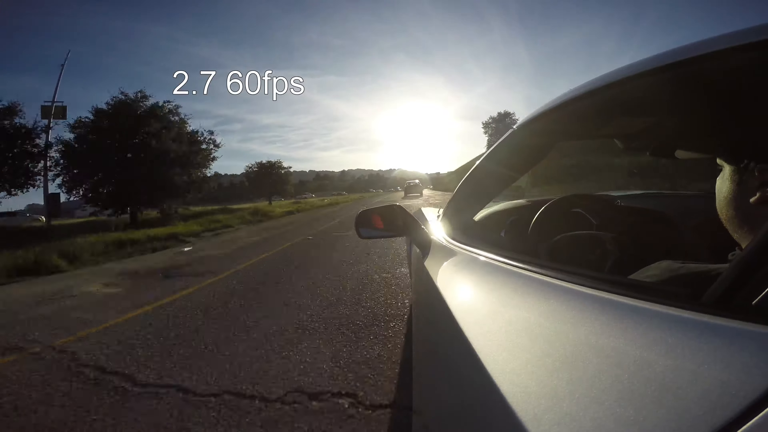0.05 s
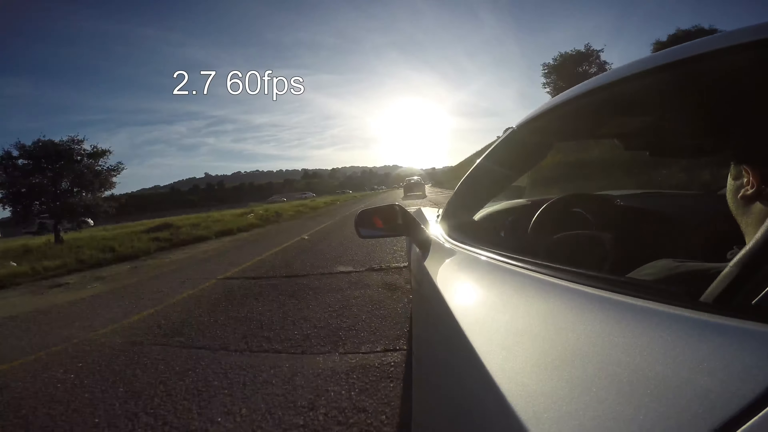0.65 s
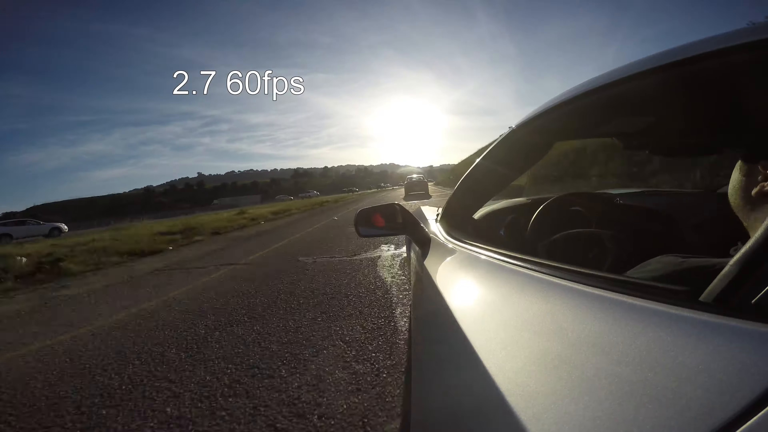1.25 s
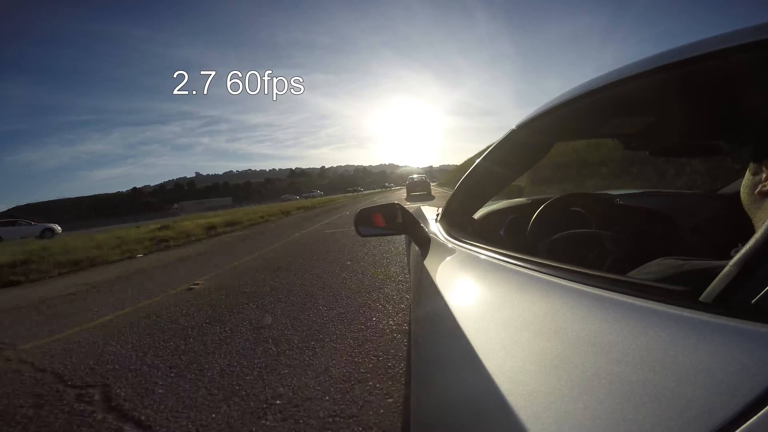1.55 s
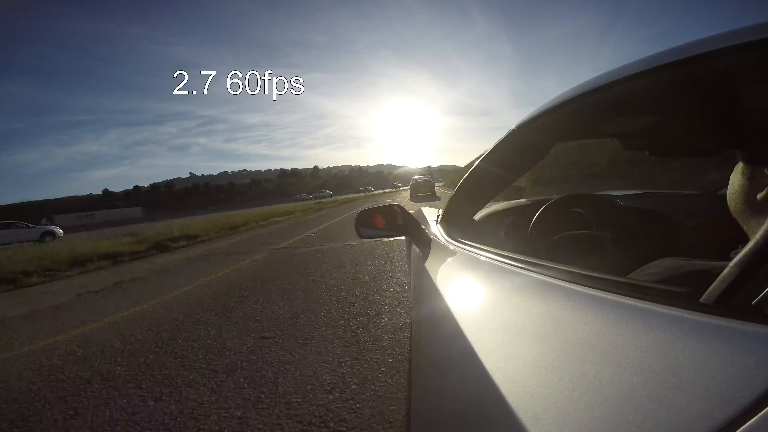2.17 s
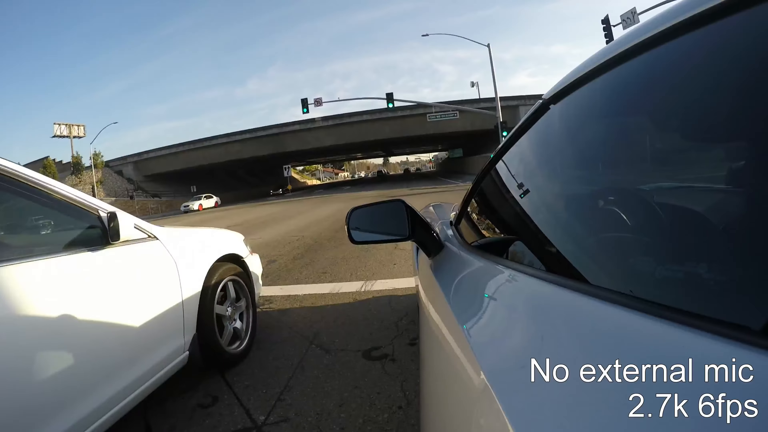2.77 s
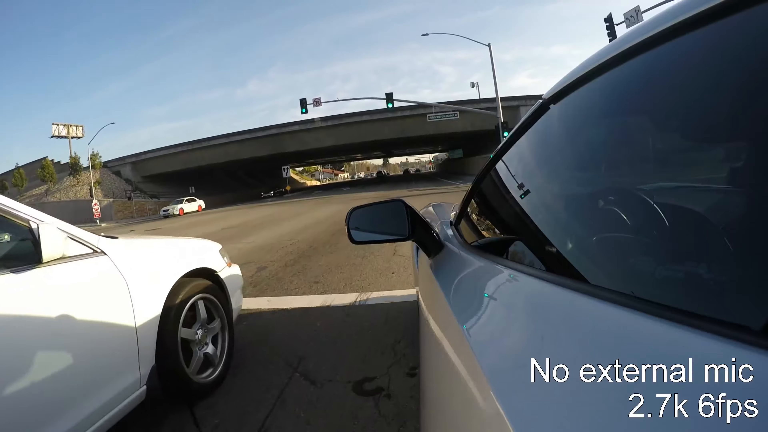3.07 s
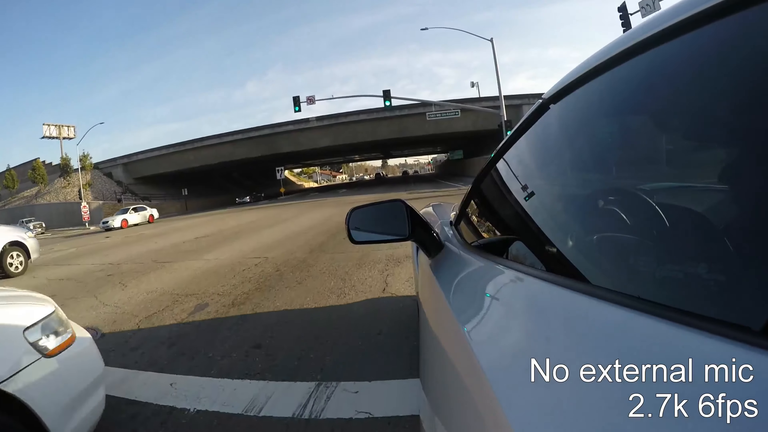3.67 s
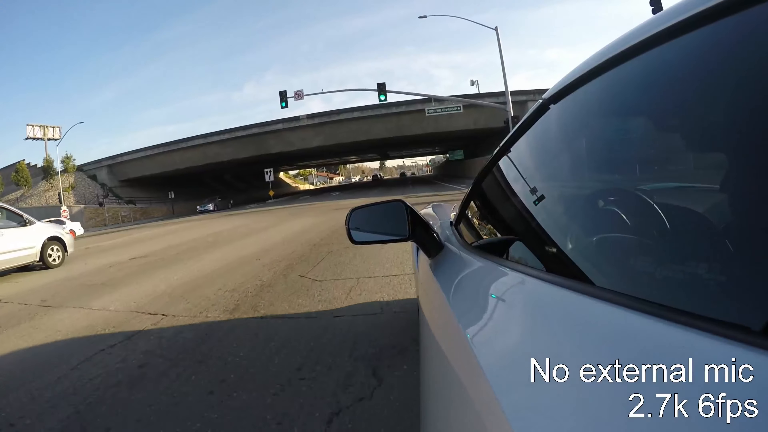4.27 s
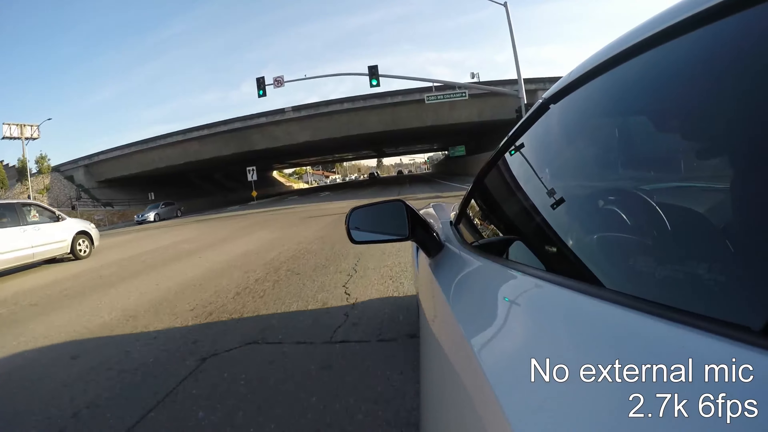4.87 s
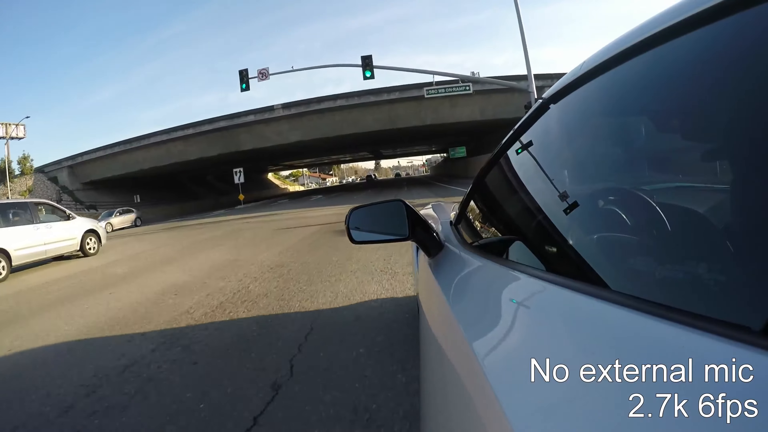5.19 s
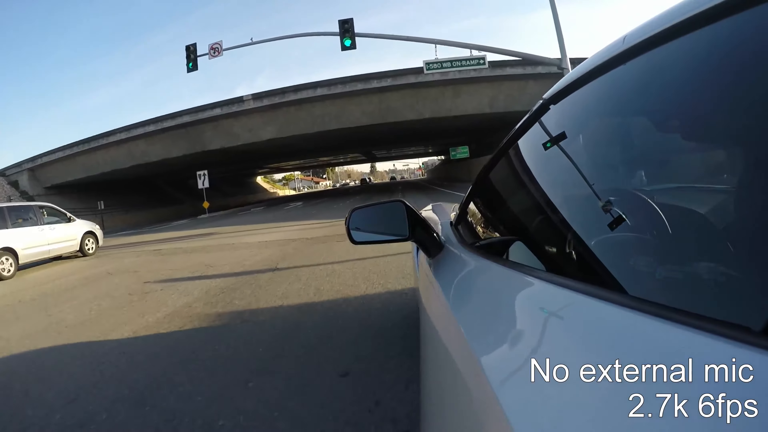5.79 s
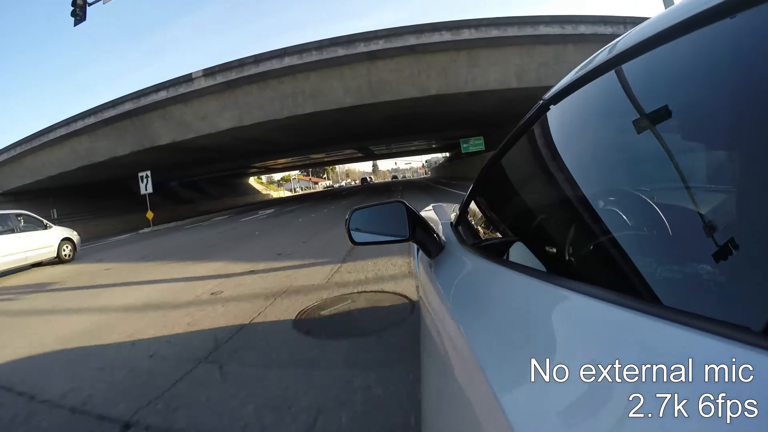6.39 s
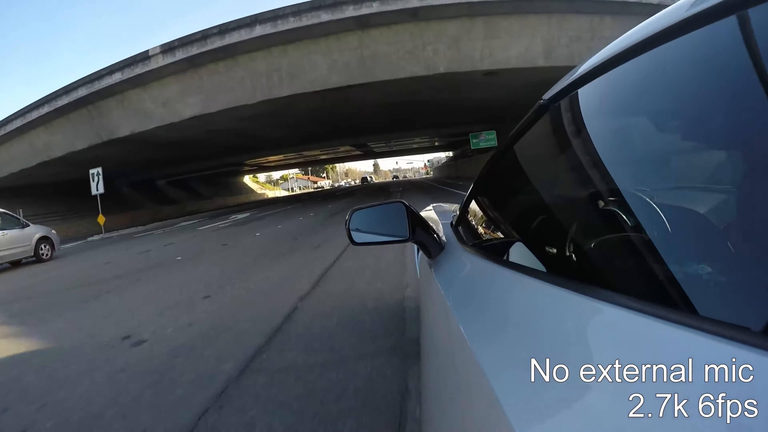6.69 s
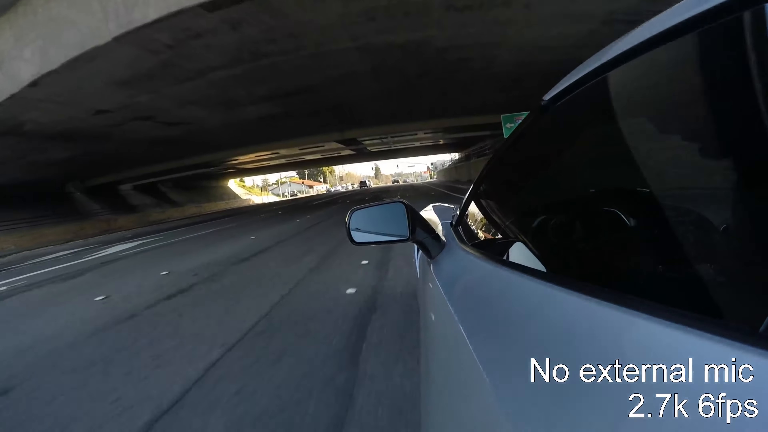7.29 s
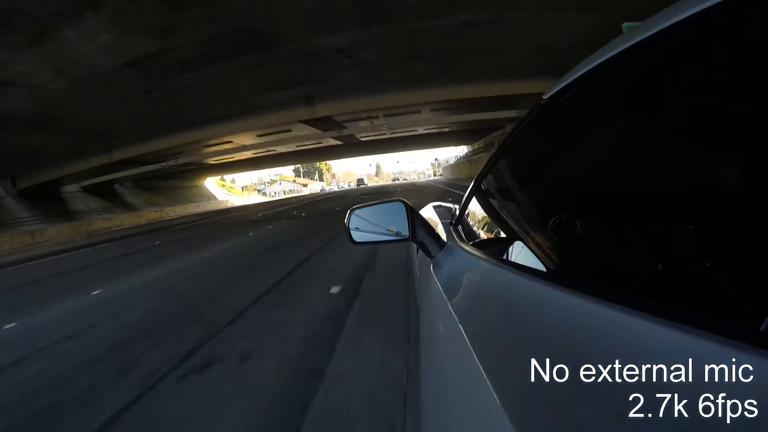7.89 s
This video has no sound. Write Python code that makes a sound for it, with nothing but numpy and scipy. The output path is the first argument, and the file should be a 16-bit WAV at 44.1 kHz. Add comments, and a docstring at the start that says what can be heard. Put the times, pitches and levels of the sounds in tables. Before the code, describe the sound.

A sports car coasts with a burbling, popping exhaust, then pulls away with a short tyre scrub and revs up through rising wind.

```python
"""A V8 sports car, heard from its side, in two scenes. First it coasts down a rough road in wide
stereo: the exhaust hums, the tyres roar and wind gusts. Grit ticks, a tyre thumps over a joint,
and the engine misfires, burbling and popping. After an instant of silence, in near mono, the car
pulls away from a junction with a short tyre scrub. It revs up towards an underpass while road
roar and wind grow, and hits a few more joints at the end."""
import sys
import numpy as np
from scipy import signal
from scipy.fft import rfft, irfft, next_fast_len
from scipy.io import wavfile

SR = 44100
rng = np.random.default_rng(int(sys.argv[2]) if len(sys.argv) > 2 else 0)


def store_pcm(level_fs):
    """Save levels as 16-bit WAV."""
    pcm = np.round(np.clip(level_fs, -1, 1) * 32767).astype(np.int16)
    wavfile.write(sys.argv[1], SR, np.atleast_2d(pcm).T)


N = 355005
CUT_S, RESUME_S = 2.755, 2.763   # the first scene ends, the second begins


def from_db(db):
    """Turn decibels into a gain."""
    return 10 ** (np.asarray(db) / 20)


def rms_one(x):
    """Scale to a power of 1."""
    return x / np.sqrt(np.mean(x ** 2) + 1e-20)


def in_time(rows, t):
    """Read a curve at times t."""
    return np.interp(t, *np.transpose(rows))


def at_hz(rows, hz):
    """Read a curve at a frequency, spacing the octaves evenly."""
    row_hz, value = np.transpose(rows)
    return np.interp(np.log(hz + 1e-3), np.log(row_hz), value)


def drift(t, rate):
    """A random wander of about 1, with a new value rate times a second."""
    knots = rng.standard_normal(4096)
    return rms_one(np.interp(t * rate, np.arange(len(knots)), knots))


def swell(t, s, half_s):
    """A smooth hump of height 1 around time s."""
    return np.exp(-.5 * ((t - s) / half_s) ** 2)


def between(t, start_s, end_s, ramp_s=0.065):
    """1 from start to end, 0 outside, with short ramps."""
    return np.clip(np.minimum(t - start_s, end_s - t) / ramp_s + .5, 0, 1)


def burst(t, s, db, decay_s):
    """The loudness of a hit that rises within 3 ms and dies away."""
    rise = np.sin(np.pi / 2 * np.clip((t - s) / .003 + .5, 0, 1)) ** 2
    return from_db(db) * rise * np.exp(-np.abs(t - s) / decay_s)


def coloured(t, colour, count):
    """Frequencies and spectra of unrelated noises of one colour, fading past the table's ends."""
    size = 2 * next_fast_len(len(t) // 2 + 1)
    hz = np.arange(size // 2 + 1) * SR / size + 1e-3
    edges = 1 / np.sqrt((1 + (.8 * colour[0][0] / hz) ** 8) * (1 + (.8 * hz / colour[-1][0]) ** 8))
    return hz, rfft(rng.standard_normal((count, size))) * from_db(at_hz(colour, hz)) * edges


# Which side is louder. Each row: frequency in Hz, left minus right in dB.
BALANCE = [(20, 2.9), (60, 0.5), (110, -2), (200, -5), (380, -9), (700, -2.5), (1100, -0.5), (2000, -2),
           (4400, -1.5)]
# How far the left wave runs ahead. Each row: frequency in Hz, lead in radians.
LEFT_LEAD = [(90, 2), (290, 2.5), (420, 2.5), (600, 3), (750, 3), (900, 2), (1100, 1.73), (1400, 1),
             (1800, 0.8), (3200, 0)]
# How alike the two sides are. Each row: frequency in Hz, likeness from 0 to 1.
LIKENESS = [(60, 0.78), (200, .88), (380, 0.73), (750, 0.85), (1400, 1), (2000, .52), (4000, .6),
            (7000, .08)]

def wide_noise(t, colour):
    """Noise that reaches the two sides out of step, plus a part of their own."""
    hz, (shared, own_left, own_right) = coloured(t, colour, count=3)
    alike = np.clip(at_hz(LIKENESS, hz), 0, .97)
    lead, lean = at_hz(LEFT_LEAD, hz), from_db(at_hz(BALANCE, hz) / 2)
    left = (np.sqrt(alike) * shared * np.exp(1j * lead) + np.sqrt(1 - alike) * own_left) * lean
    right = (np.sqrt(alike) * shared + np.sqrt(1 - alike) * own_right) / lean
    sum_gain = np.sqrt(lean ** 2 + lean ** -2 + 2 * alike * np.cos(lead))
    x = irfft(np.array([left, right]) / sum_gain)[:, :len(t)]
    return x / np.std(x.mean(axis=0))


# Stereo width. Each row: frequency in Hz, the sides' difference against their shared part in dB.
WIDTH = [(400, -71), (2400, -49), (4400, -34.5), (8000, -21.5), (15000, -13)]

def narrow_noise(t, colour):
    """Noise that is nearly the same on both sides."""
    hz, (mid, side) = coloured(t, colour, count=2)
    side = side * from_db(at_hz(WIDTH, hz))
    x = irfft([mid + side, mid - side])[:, :len(t)]
    return x / np.std(x.mean(axis=0))


def crank(t, firing, jitter):
    """Turns per second and angle of the crankshaft: a V8 fires four times a turn, never quite evenly."""
    speed = in_time(firing, t) / 4 * (1 + jitter * drift(t, 60))
    return speed, 2 * np.pi * np.cumsum(speed) / SR


def exhaust_tones(t, speed, strong_db, weak_db, strong_shake, pipe, spread_db, waver_hz, weak_shake=.8):
    """Unequal cylinders make a tone at every half step of 'order', the multiple of crank speed."""
    for order in np.arange(1, 65) / 2:
        hz = speed * order
        level_db, shake = weak_db + spread_db * drift(t, 2.384), weak_shake
        if order in strong_db:
            level_db, shake = strong_db[order], strong_shake
        # uneven burning shakes each tone in strength and timing
        along, across = 1 + shake * drift(t, waver_hz), shake * drift(t, waver_hz)
        waver = np.hypot(along, across) / np.sqrt(1 + 2 * shake ** 2)
        phase = np.arctan2(across, along) + rng.uniform(0, 2 * np.pi)
        yield order, hz, from_db(level_db + at_hz(pipe, hz)) * waver, phase


def firing_puffs(angle, depth):
    """Noise swells each time a cylinder fires."""
    return 1 + depth * np.cos(4 * angle)


# Tones that stand out while coasting. Each row: order, boost in dB before the burble,
# boost in dB after it, extra dB during the lope.
COAST_TONES = [(1, -4, 9, -2), (1.5, -11, -11, 11), (2, -3, -1, 4), (2.5, -11, -6, 6), (3, 6, 7.5, 1),
               (4, 11.5, 12, -4), (5, -11, -6, 0), (6, -4, -8, 21), (7.5, -3, -5, -3), (8, 4.5, 0, -4),
               (8.5, 3.5, 0, -2), (9, -3, -3, -3), (10, -10, -3, 0), (10.5, -12, -12, 10), (11, 2, 1.5, -2),
               (11.5, -4, -8, 7), (12, -3, 3.5, -2), (12.5, -10, -3.5, -3), (14, 3, 3, -6), (16, 0, -1, 0),
               (20, 0, 0, 0)]
# How the pipe colours the tones with the throttle shut. Each row: frequency in Hz, gain in dB.
SHUT_PIPE = [(40, -40), (85, -32), (100, -26.5), (140, -35), (170, -32.5), (240, -33.5), (280, -45),
             (340, -37), (400, -39), (440, -35), (465, -31.5), (495, -34), (530, -24.5), (560, -28),
             (595, -39), (650, -28.5), (760, -45), (880, -37), (950, -44), (1500, -51), (2200, -58)]

def coasting_exhaust(t, speed, angle):
    """The exhaust hums, burbles as it misfires, then lopes as every other cylinder fires weakly."""
    start_s, end_s = 1.04, 1.39   # the burble
    burble, lope = between(t, start_s, end_s), between(t, end_s, 1.8)
    progress = np.clip((t - start_s) / (end_s - start_s), 0, 1)
    # misfiring lifts the weak tones, and lowers and shakes the strong ones
    weak_db = -12.5 + 3 * burble + 2.5 * lope
    strong_db = {order: 0.5 - 6 * burble + before_db + (after_db - before_db) * progress + lope_db * lope
                 for order, before_db, after_db, lope_db in COAST_TONES}
    shake = np.maximum(.1, .9 * burble)
    tones = exhaust_tones(t, speed, strong_db, weak_db, shake, SHUT_PIPE, spread_db=5, waver_hz=27.58)
    out = np.zeros((2, len(t)))
    for order, hz, gain, phase in tones:
        lean = from_db(at_hz(BALANCE, hz) / 2)
        out[0] += gain * lean * np.sin(order * angle + phase + at_hz(LEFT_LEAD, hz))
        out[1] += gain / lean * np.sin(order * angle + phase)
    return 2 * out   # the sides nearly cancel, so each is louder than their average


# The colour of light wind. Each row: frequency in Hz, level in dB.
BREEZE = [(8, 1), (20, 3.5), (38, -4.5), (55, -5), (80, -8), (140, -17.5), (300, -34.5)]
# Puffs of wind. Each row: time in seconds, level in dB.
BREEZE_GUSTS = [(.135, -25), (.28, -36), (.48, -17), (.6, -36), (.87, -21), (1.22, -21), (1.52, -20),
                (2.26, -22)]

def coasting_wind(t):
    """Air buffets the microphone: a low flutter with short gusts."""
    strength = from_db(-25.5) + sum(from_db(db) * swell(t, s, half_s=0.015) for s, db in BREEZE_GUSTS)
    return strength * from_db(3.2 * drift(t, 8.66)) * wide_noise(t, BREEZE)


# The colours of tyre roar and rumble. Each row: frequency in Hz, level in dB.
ASPHALT_ROAR = [(410, -39.5), (700, -5.5), (746, -7.5), (1060, -2.5), (1150, -5.5), (1420, -7),
                (1760, -13.5), (2370, -21), (2760, -20), (3140, -27.5), (3660, -25), (5110, -42.5),
                (10900, -49.5), (15000, -71)]
ASPHALT_RUMBLE = [(40, -3.5), (80, -10), (200, -4.5), (275, 1), (350, -2), (550, -0.5), (700, -2),
                  (1000, -24.5)]
# The rumble follows the state of the asphalt. Each row: time in seconds, level in dB.
ROUGHNESS = [(0, -27.5), (1.35, -27.5), (1.6, -31.5), (2.02, -31.5), (2.2, -25), (2.32, -33), (2.75, -33.5)]

def coasting_tyres(t):
    """Tyres roar and rumble on coarse asphalt, sinking a little as the car slows."""
    roar = from_db(-32 + 0.7 * drift(t, 40.13)) * wide_noise(t, ASPHALT_ROAR)
    rumble = from_db(in_time(ROUGHNESS, t) + 0.34 * drift(t, 35.12)) * wide_noise(t, ASPHALT_RUMBLE)
    return from_db(-0.3 * (t - t.mean())) * (roar + rumble)


# The engine slowing down. Each row: time in seconds, firings per second.
COAST_FIRING = [(0, 245.3), (0.3, 235.6), (1.05, 208.4), (1.7, 191.1), (2.3, 175.7), (2.75, 170.6)]

def coasting(t):
    """The first scene: the car rolls with the throttle shut."""
    speed, angle = crank(t, COAST_FIRING, jitter=0.0023)
    exhaust = coasting_exhaust(t, speed, angle)
    return exhaust + coasting_wind(t) + coasting_tyres(t) * firing_puffs(angle, depth=0.16)


# Tiny stones. Each row: time in seconds, level in dB, middle frequency in Hz.
STONES = [(.793, -54, 7000), (.898, -54, 7000), (.958, -58, 7000), (1.249, -55, 6000), (2.51, -56, 7000),
          (5.72, -45, 7500), (6.487, -42, 5000), (7.3, -44, 4500), (7.66, -32, 3500), (7.749, -34, 3300)]

def grit_ticks(t):
    """Grit flicked up by the tyres ticks on the body."""
    white, out = rng.standard_normal(len(t)), 0
    for s, db, hz in STONES:
        band = signal.butter(2, [hz / 1.7, hz * 1.46], "band", fs=SR, output="sos")
        out += burst(t, s, db, decay_s=0.011) * rms_one(signal.sosfilt(band, white))
    return out


# Joints in the road. Each row: time in seconds, thump in dB, slap in dB, slap decay in seconds.
ROAD_JOINTS = [(0.874, -17, -16, .005), (2.094, -13, -38, .015), (2.137, -12, -32, .015),
               (2.227, -14, -25, .015), (7.563, -20, -27, .015), (7.659, -16, -14, .012),
               (7.6805, 1.5, -26, .005), (7.745, -18, -24, .015)]
# The colour of a slap. Each row: frequency in Hz, level in dB.
SLAP_COLOUR = [(400, 3), (800, -1.5), (1400, -15), (2000, -30)]

def joint_hits(t, bounce_hz=205, bounce_decay_s=.003, dull_hz=900):
    """A tyre slaps a joint and bounces with a low thump, whose start the soft rubber rounds off."""
    slaps = thumps = 0
    for s, thump_db, slap_db, decay_s in ROAD_JOINTS:
        age = np.maximum(t - s, 0)
        slaps += burst(t, s, slap_db, decay_s)
        thumps += from_db(thump_db) * np.exp(-age / bounce_decay_s) * np.sin(2 * np.pi * bounce_hz * age)
    rubber = signal.butter(2, dull_hz, fs=SR, output="sos")
    return slaps * narrow_noise(t, SLAP_COLOUR) + signal.sosfilt(rubber, thumps + 1e-18)


# Pops in the exhaust. Each row: start in seconds, level in dB.
FUEL_POPS = [(1.033, -17), (1.054, -16), (1.074, -16), (1.094, -18), (1.131, -15), (1.183, -20),
             (1.213, -18), (1.243, -15), (1.263, -18), (1.336, -14), (1.361, -16)]
# The pipe's own notes. Each row: pitch in Hz, level in dB, seconds to fade by 60 dB.
PIPE_NOTES = [(115, -7, 0.044), (225, 5.5, 0.058), (467, -1, .05), (560, -2, 0.049)]

def exhaust_pops(t):
    """Unburnt fuel goes off in dull bursts, each ringing the pipe a little differently."""
    rings, age = np.zeros((2, N)), np.arange(SR // 10) / SR
    for s, pop_db in FUEL_POPS:
        start = int(s * SR)
        for hz, db, fade_s in PIPE_NOTES:
            phase = 2 * np.pi * hz * rng.uniform(.93, 1.07) * age
            ring = from_db(pop_db + db - 60 * age / fade_s) * np.minimum(age / .002, 1)
            rings[:, start:start + len(age)] += ring * np.sin([phase + at_hz(LEFT_LEAD, hz), phase])
    # Each row: frequency in Hz, level in dB.
    colour = [(110, 3), (230, 6), (350, -6), (520, 2), (700, -11), (1200, -8.5), (2000, -52)]
    bangs = sum(burst(t, s, db - 2.5, decay_s=0.021) for s, db in FUEL_POPS)
    return rings + bangs * wide_noise(t, colour)


def load_db(throttle, full_db, lost_db):
    """A level that drops from full_db by lost_db as the throttle shuts."""
    return full_db - lost_db * (1 - throttle)


def speed_db(speed, top_db, doubling_db):
    """A level that gains doubling_db each time speed doubles; top speed is 1."""
    return top_db + doubling_db * np.log2(np.maximum(speed, .01))


def together(*levels_db):
    """The gain of unrelated noises heard at once."""
    return np.sqrt(sum(from_db(db) ** 2 for db in levels_db))


# Tones that stand out while pulling. Each row: order, boost in dB at low revs, then at high revs.
PULL_TONES = [(1.5, -20, -20), (2, -22, -19), (2.5, -19, -16), (5, -14, -5), (6, -11, -3), (8, 6, 4.5),
              (12, 0.5, -3), (16, -3, 1.5), (17, -12, -4), (20, -5, 0), (24, -3, -5), (28, -7, -9),
              (32, -5, -12)]
# How the pipe colours the tones with the throttle open. Each row: frequency in Hz, gain in dB.
OPEN_PIPE = [(20, -50), (50, -32), (75, -22.5), (100, -25), (130, -37), (155, -30), (190, -30),
             (245, -27.5), (285, -32), (320, -32.5), (380, -38), (410, -47), (435, -36), (452, -30),
             (472, -38), (495, -48), (590, -50), (635, -37), (665, -34.5), (700, -39), (745, -34),
             (800, -47), (870, -35.5), (910, -42), (960, -34.5), (1010, -34), (1050, -41), (1095, -36.5),
             (1150, -45), (1210, -41), (1300, -51), (1450, -47), (1850, -59), (2030, -49), (2300, -59),
             (3000, -61)]

def pulling_exhaust(t, speed, angle, firing_hz, throttle, low_revs_hz=150, high_revs_hz=215):
    """The exhaust grows louder and raspier as the throttle opens."""
    revs = np.clip((firing_hz - low_revs_hz) / (high_revs_hz - low_revs_hz), 0, 1)
    strong_db = {order: load_db(throttle, 7.5, 11) + low_db + (high_db - low_db) * revs
                 for order, low_db, high_db in PULL_TONES}
    weak_db, shake = load_db(throttle, -3.5, 24), .27 * throttle
    tones = exhaust_tones(t, speed, strong_db, weak_db, shake, OPEN_PIPE, spread_db=3.5, waver_hz=24.09)
    dull_db = 5 * (1 - throttle)   # lost per octave above order 8: a shut throttle rounds the pulses
    return sum(gain * from_db(-dull_db * np.log2(max(order / 8, 1))) * np.sin(order * angle + phase)
               for order, _, gain, phase in tones)


# What the silencer lets through. Each row: frequency in Hz, gain in dB.
SILENCER = [(37, 0), (52, 4.5), (95, 4), (130, -1.5), (185, -.5), (240, -3.5), (268, -7), (285, -11),
            (300, -15.5), (320, -24)]

def exhaust_boom(t, angle, firing_hz, throttle):
    """A clean tone at the firing rate, which the silencer passes only in the bass."""
    level_db = load_db(throttle, -8, 8) + at_hz(SILENCER, firing_hz) + 0.59 * drift(t, 35)
    return from_db(level_db) * np.sin(4 * angle)


# The colours of roar, hiss and high sizzle. Each row: frequency in Hz, level in dB.
ROAR_COLOUR = [(200, -4), (450, -2), (750, 1.5), (1050, 1), (1400, -3), (1900, -12), (2600, -28.5)]
HISS_COLOUR = [(1120, -20.5), (1900, -2), (2040, -0.5), (2350, -2.5), (3030, 0), (4490, -9.5),
               (5360, -12.5), (8380, -27.5), (12000, -30.5), (13200, -42), (15500, -66)]
SIZZLE_COLOUR = [(2500, -6.5), (3600, 2), (4500, -10.5), (5400, 1), (6400, -4.5), (7600, -17), (10500, -17),
                 (14000, -25.5), (15500, -31.5)]
# How loud the sizzle is. Each row: time in seconds, level in dB.
SIZZLE_CURVE = [(2.76, -53), (4.3, -47.5), (5.3, -43.5), (5.9, -52), (7, -49.5), (8.05, -45.5)]

def roar_and_hiss(t, road_speed, throttle):
    """Road noise grows with speed, exhaust gas and intake with throttle; idling traffic falls behind."""
    gas_db, intake_db = load_db(throttle, -28.5, 11.8), load_db(throttle, -37, 11.8)
    traffic_db = -39.5 - 16 * (t - RESUME_S)
    roar_gain = together(speed_db(road_speed, -26, 11.8), gas_db, traffic_db)
    hiss_gain = together(speed_db(road_speed, -35, 11.8), intake_db, traffic_db - 2.5)
    roar = roar_gain * from_db(0.77 * drift(t, 30)) * narrow_noise(t, ROAR_COLOUR)
    hiss = hiss_gain * from_db(0.89 * drift(t, 50)) * narrow_noise(t, HISS_COLOUR)
    sizzle = from_db(in_time(SIZZLE_CURVE, t)) * narrow_noise(t, SIZZLE_COLOUR)
    return roar + hiss + sizzle


# Slips of a tyre on the stop line. Each row: time in seconds, half length in seconds,
# rasp in dB, squeak in dB, squeak pitch in Hz.
SLIPS = [(3.034, .008, -47, -58, 5200), (3.177, 0.011, -39.5, -44, 6550), (3.296, 0.017, -44, -37, 5200),
         (3.319, 0.0087, -47, -35.5, 5200), (3.35, 0.0097, -43, -32, 5230), (3.372, 0.0051, -49, -35, 6480),
         (3.396, 0.023, -49, -41, 5300), (3.454, .06, -46, -52, 5250)]
# The colours of the rasp and the lower grind. Each row: frequency in Hz, level in dB.
RASP_COLOUR = [(1500, 6), (4000, 1), (5000, -2), (6600, 3), (8000, -14), (11000, -12), (15000, -21)]
GRIND_COLOUR = [(500, -7), (1200, 2), (2000, -6), (4000, -17)]

def tyre_scrub(t, pitch_wander_hz=250):
    """Rubber sticks and slips: each slip rasps and squeaks, over the fluttering grind of the tread."""
    rasps = squeaks = 0
    for s, half_s, rasp_db, squeak_db, hz in SLIPS:
        slip = swell(t, s, half_s)
        pitch = hz + pitch_wander_hz * drift(t, 970)
        rasps += from_db(rasp_db) * slip
        squeaks += from_db(squeak_db) * slip * np.sin(2 * np.pi * np.cumsum(pitch) / SR)
    grind = from_db(-33.5) * swell(t, 3.345, half_s=0.063) * narrow_noise(t, GRIND_COLOUR)
    return (rasps * narrow_noise(t, RASP_COLOUR) + squeaks + grind) * from_db(2.2 * drift(t, 160))


# The colours of deep wind buffeting and rumble. Each row: frequency in Hz, level in dB.
BUFFET_COLOUR = [(10, -30), (22, -6.5), (36, 2), (50, -7), (80, -7), (140, -20), (300, -29.5)]
RUMBLE_COLOUR = [(50, -24), (110, 0), (250, 1), (400, -3.5), (600, -12.5), (900, -24.5)]

def rising_wind(t, airflow):
    """Wind buffets and rumbles as the car gains speed, and swells at the mouth of the underpass."""
    underpass_db = 2 * swell(t, 7.1, half_s=0.36)
    buffet_db = speed_db(airflow, -14, 3.45) + underpass_db + 0.6 * drift(t, 14)
    buffet = from_db(buffet_db) * narrow_noise(t, BUFFET_COLOUR)
    rumble_db = speed_db(airflow, -22, 3.15) + 2 * drift(t, 25)
    return buffet + from_db(rumble_db) * narrow_noise(t, RUMBLE_COLOUR)


# The engine dips, then revs up. Each row: time in seconds, firings per second.
PULL_FIRING = [(2.76, 56.3), (3.2, 37.3), (3.32, 38.0), (3.5, 51.6), (3.6, 52.1), (3.8, 63.8), (4.12, 81.8),
               (4.46, 100.0), (4.76, 111.8), (4.83, 116.9), (5.0, 125.2), (5.16, 129.3), (5.33, 144.0),
               (5.48, 148.7), (5.8, 173.4), (7.0, 269.9), (7.6, 316.1), (8.05, 319.2)]
# The driver's foot. Each row: time in seconds, throttle from 0 (shut) to 1 (open).
PEDAL = [(2.76, 0.18), (3.08, 0.1), (3.4, 0.51), (3.85, 0.19), (5.24, 0.68), (5.32, 0.98), (7.05, 0.92),
         (7.45, 0.85), (8.05, 0)]

def pulling_away(t, calm_hz=82.6, top_hz=320):
    """The second scene: the car stays in one gear, so road speed follows the engine."""
    speed, angle = crank(t, PULL_FIRING, jitter=0.0028)
    firing_hz, throttle = in_time(PULL_FIRING, t), in_time(PEDAL, t)
    exhaust = pulling_exhaust(t, speed, angle, firing_hz, throttle)
    boom = exhaust_boom(t, angle, firing_hz, throttle)
    road = roar_and_hiss(t, firing_hz / top_hz, throttle) * firing_puffs(angle, depth=0.1)
    airflow = (firing_hz - calm_hz) / (top_hz - calm_hz)   # below calm_hz the wind stays faint
    return exhaust + boom + road + rising_wind(t, airflow) + tyre_scrub(t)


def scene():
    """Coasting, an instant of silence, then pulling away, with the ticks, thumps and pops on top."""
    t = np.arange(N) / SR
    first, second = t < CUT_S, t >= RESUME_S
    out = np.zeros((2, N))
    out[:, first] = coasting(t[first])
    out[:, second] = pulling_away(t[second])
    return out + grit_ticks(t) + joint_hits(t) + exhaust_pops(t)


def record(dry, cutoff_hz=15700):
    """Round off the tallest peaks and remove the highest treble."""
    rounded = dry / (1 + dry ** 8) ** (1 / 8)
    return signal.sosfilt(signal.cheby2(16, 60, cutoff_hz, fs=SR, output="sos"), rounded)


dry = scene()
out = record(dry)
store_pcm(out)
```